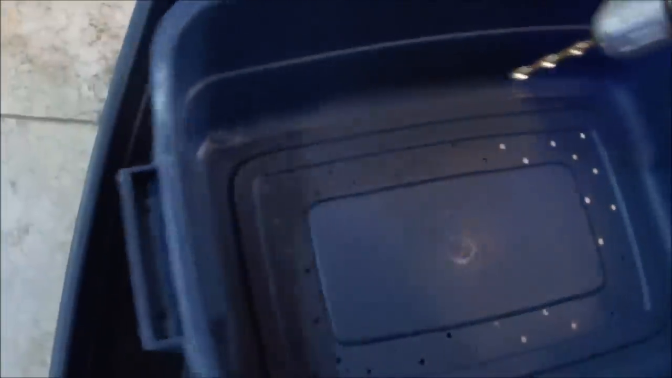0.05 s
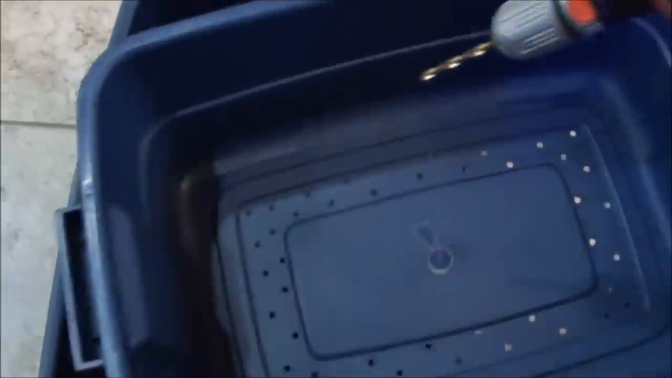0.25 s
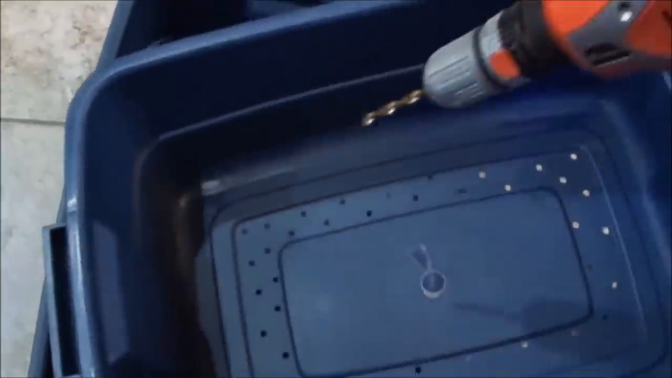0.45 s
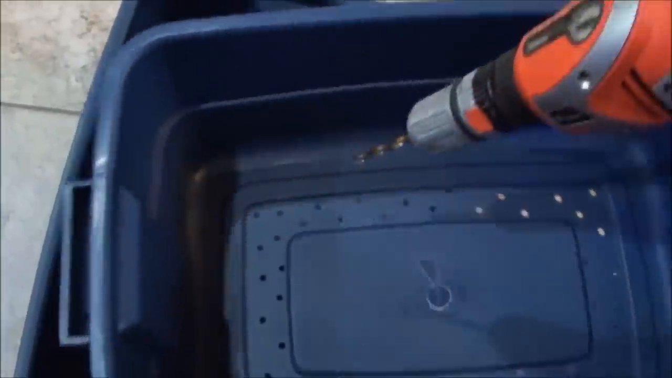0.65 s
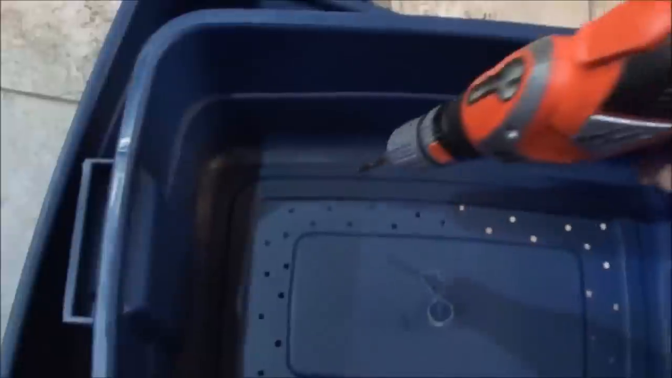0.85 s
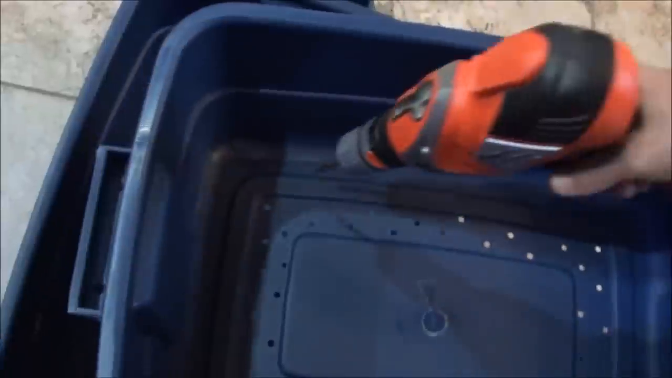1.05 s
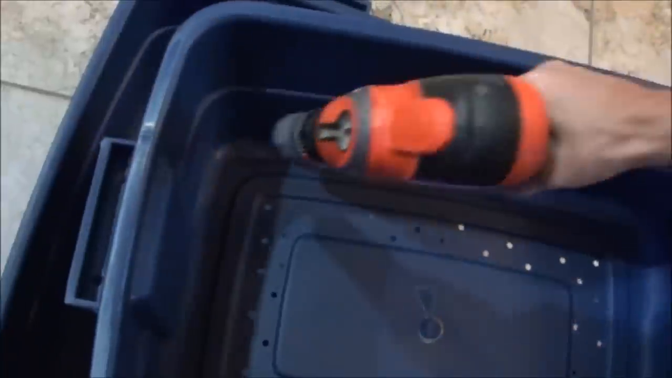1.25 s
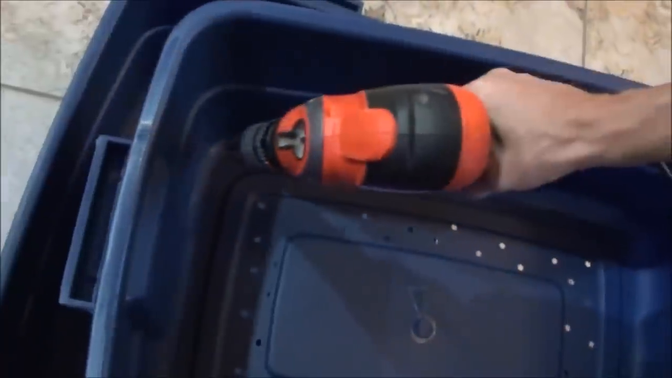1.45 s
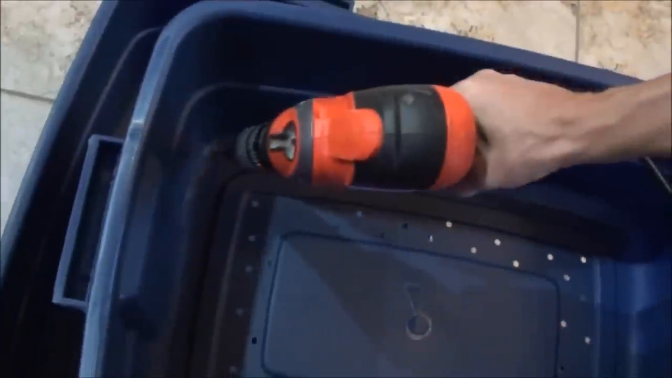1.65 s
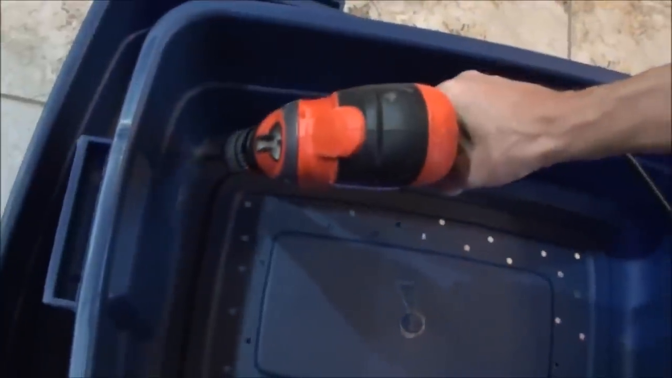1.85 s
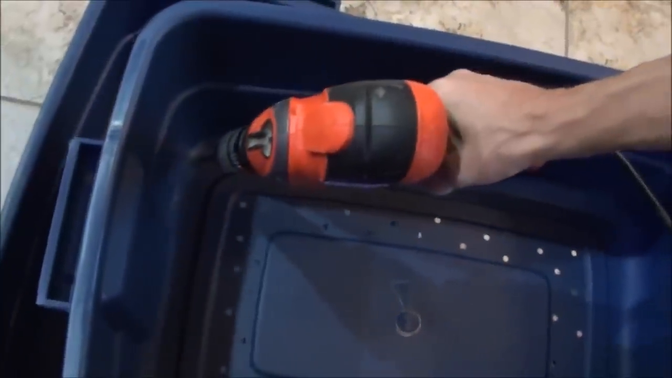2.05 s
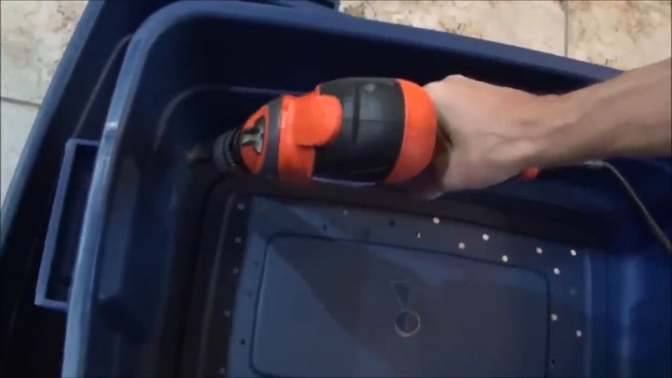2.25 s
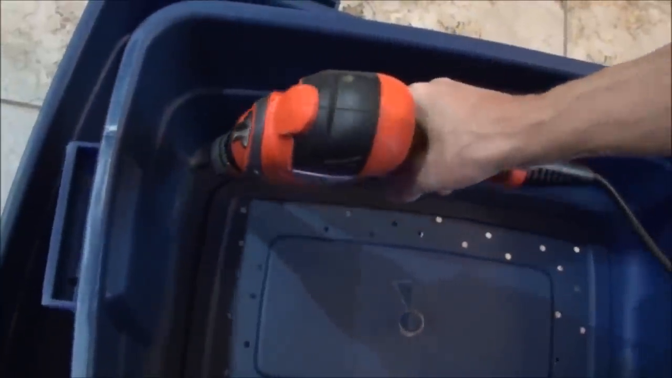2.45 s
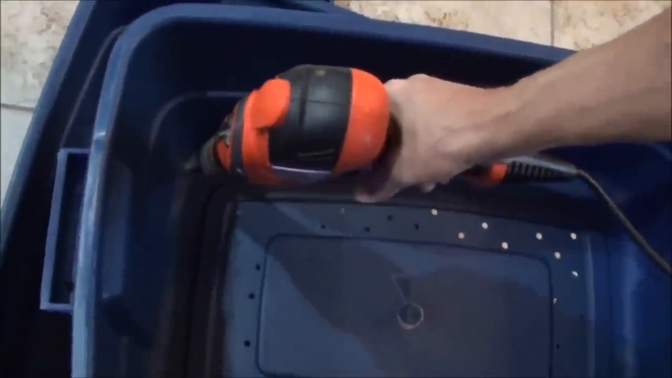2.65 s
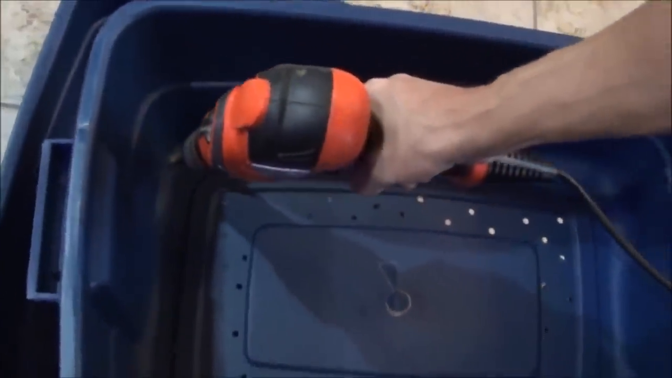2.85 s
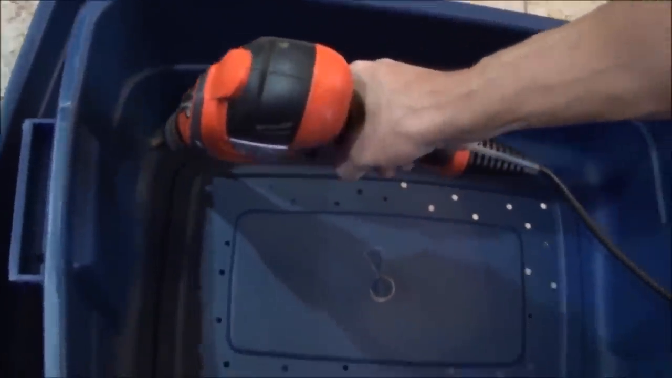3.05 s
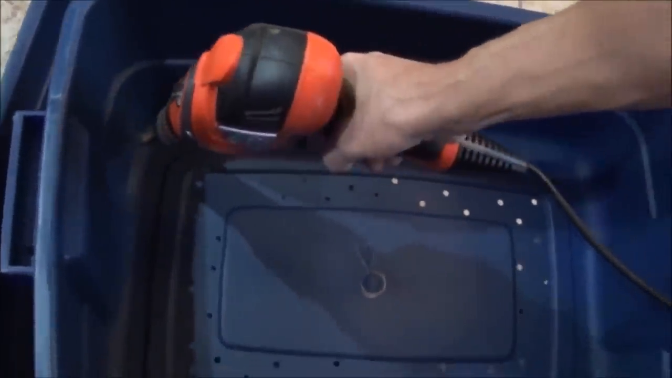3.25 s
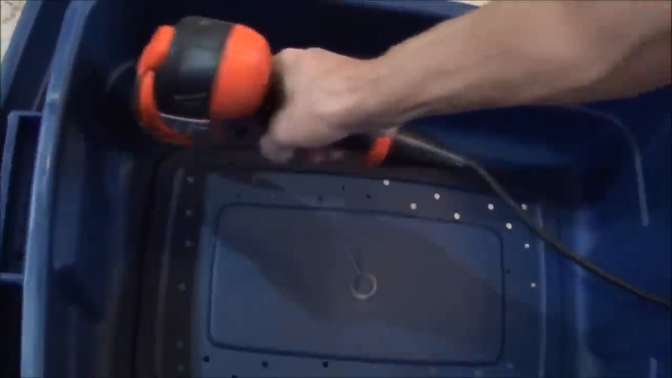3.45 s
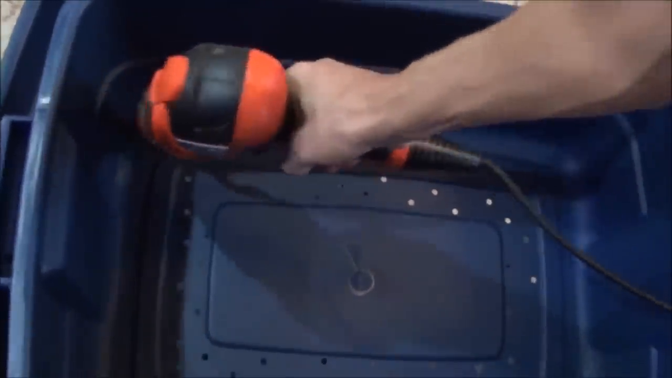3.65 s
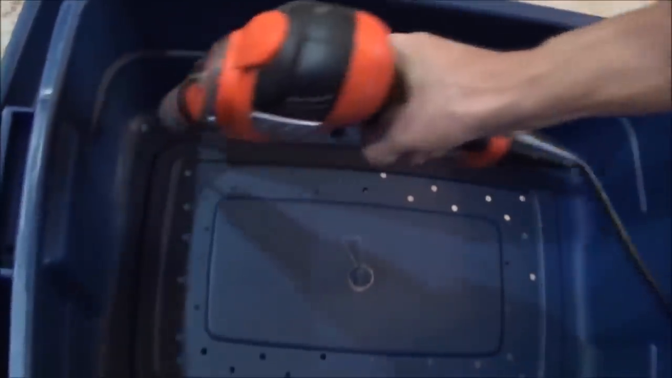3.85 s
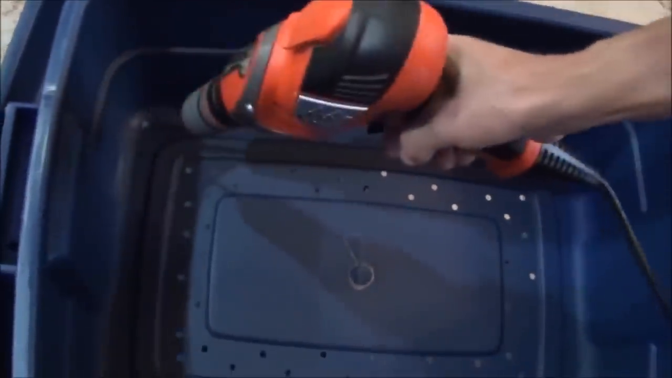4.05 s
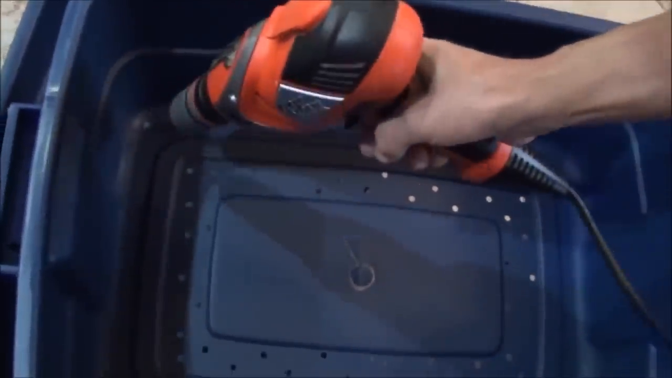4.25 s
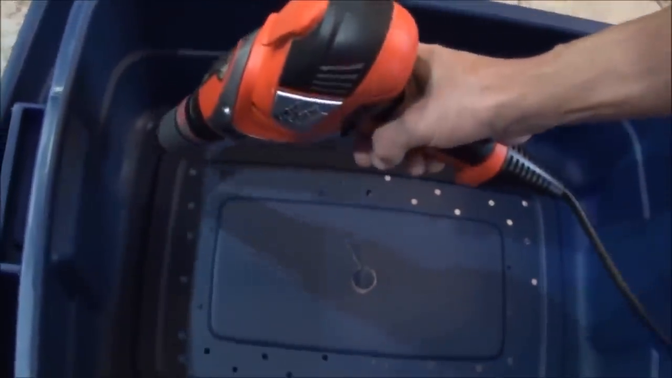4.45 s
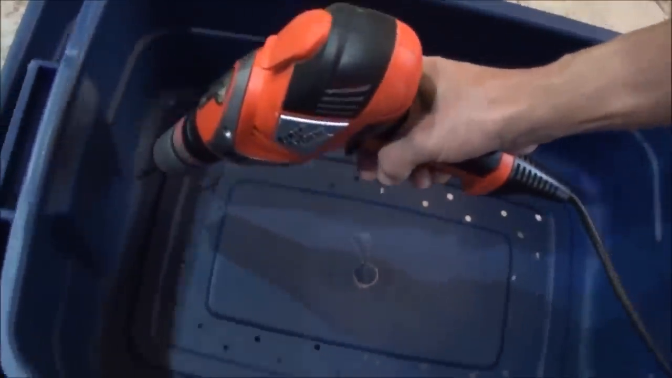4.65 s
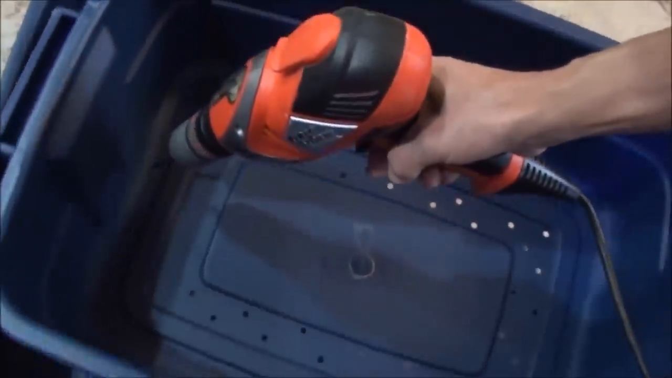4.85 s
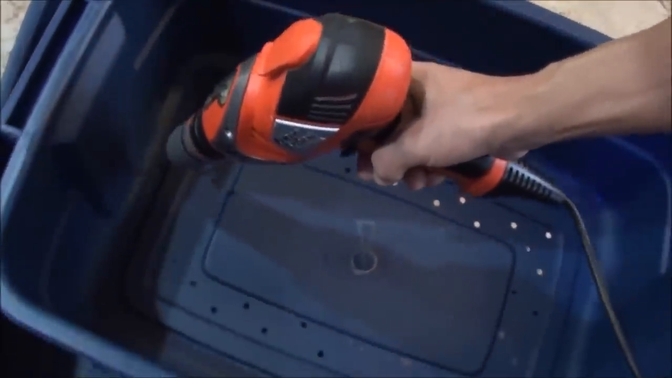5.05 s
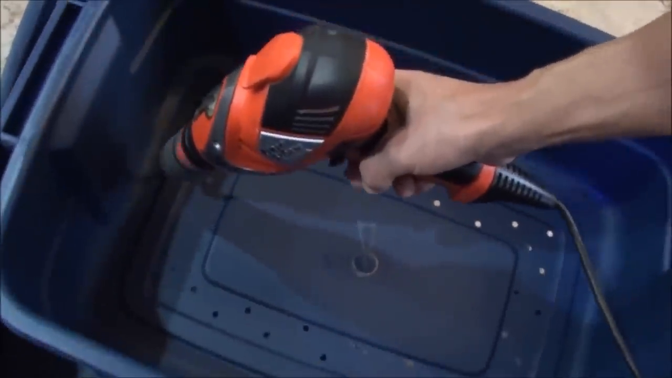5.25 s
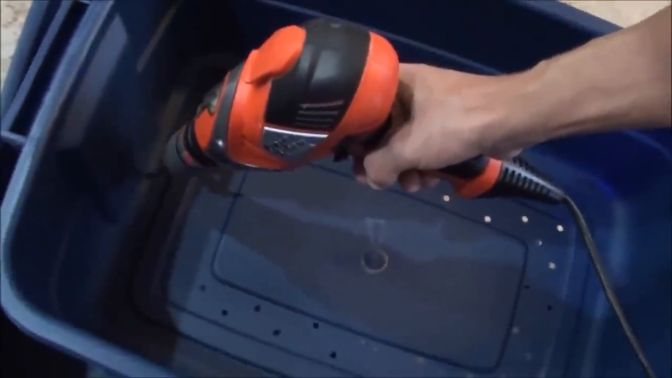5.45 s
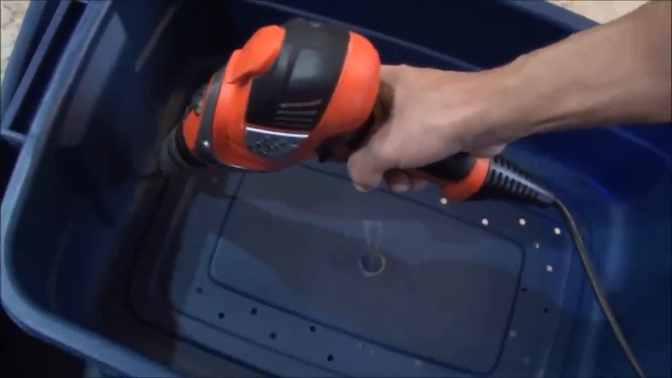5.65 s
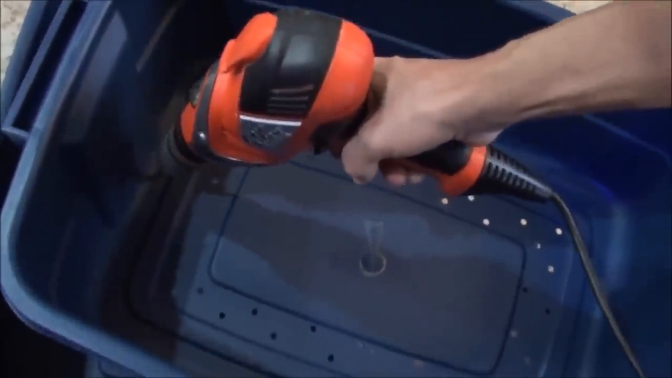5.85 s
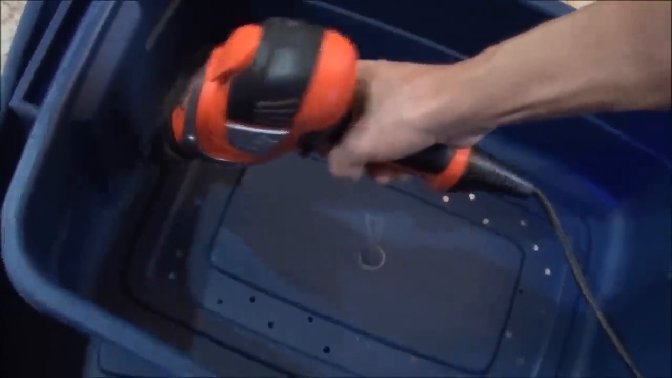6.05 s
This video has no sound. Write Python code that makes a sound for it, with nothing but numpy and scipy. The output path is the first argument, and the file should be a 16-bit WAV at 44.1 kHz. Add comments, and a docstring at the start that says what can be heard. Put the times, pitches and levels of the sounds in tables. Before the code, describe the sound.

A corded electric drill is moved into a plastic storage tub with hollow knocks, rubbing, a short skid and a few tiny ticks. After faint squeaks and sharp clicks, the motor winds up in a rising, rattling whine and briefly tears through the plastic wall. It coasts down with a falling whine, then starts up again right at the end. The sound is close, in a small, quiet room.

```python
"""A drill in a plastic tub

A corded drill is carried into a storage tub, knocking and rubbing against it. The bit is set on
the wall, the trigger clicks, and the motor winds up, bores through and coasts down; just before
the end the trigger is pulled again. One spinning shaft sets the pitch of the whining fan and
gears, heard over rattling teeth, hissing brushes and cooling air."""
import sys
import numpy as np
from scipy import signal
from scipy.fft import rfft, irfft
from scipy.io import wavfile
from scipy.ndimage import uniform_filter1d

SR = 44100
rng = np.random.default_rng(int(sys.argv[2]) if len(sys.argv) > 2 else 0)


def wrap_up_sound(samples):
    """Save the sound to the file named by the first command line argument, as 16-bit audio."""
    columns = np.atleast_2d(samples).T
    # keep every value between -1 and 1, then stretch to whole-number steps
    tamed = np.clip(columns, -1, 1)
    steps = np.round(tamed * 32767).astype(np.int16)
    wavfile.write(sys.argv[1], SR, steps)


N = 269451
TIME = np.arange(N) / SR
HIGHEST_HZ = 15780


# brief swells and dips of rattle and hiss: (middle [s], length [s], change [dB])
SURGES = [(3.046, 0.076, 1), (4.702, 0.25, 2), (5.094, 0.13, -4.5), (5.707, 0.072, 2.5)]
def drill():
    """One shaft drives the fan and gears; pulsing mains current makes it turn unevenly."""
    speed, current = shaft_speed(), motor_current()
    strain = current * np.exp(-speed / 130)  # a slow motor draws the most current
    ripple, mains = np.sin(2 * np.pi * 120 * TIME), np.sin(2 * np.pi * 60 * TIME)
    wobble = current * (.5 + 6 * strain) * (ripple + mains + drift(200)) + .15 * drift(60)
    angle = 2 * np.pi * np.cumsum(speed + wobble) / SR
    air = running_gain(speed, strain, top_db=-20, doubling_db=4.34, strain_db=-4.7)
    rattle = running_gain(speed, strain, top_db=-19, doubling_db=3.64, strain_db=25.3) * humps(SURGES)
    hiss = running_gain(speed, strain, top_db=-15.5, doubling_db=3.74, strain_db=13.6) * humps(SURGES)
    hiss /= 1 + (73 / speed) ** 6  # fades below 73 turns a second
    tones = (fan_whine(angle, speed, current, strain)
             + rattle * powered_whine(angle, current, strain)
             + hiss * coasting_whine(angle, speed, current)
             + air * rotor_hum(angle, speed))
    spun_up = np.clip(speed / 60 - 1, 0, 1)  # tones only stand out once the shaft is fast
    throb = amp(2.6 * strain * ripple + 1.08 * drift(72))  # pulses of current shake a slow motor
    return (np.sqrt(2) * spun_up * tones
            + rattle * gear_rattle(angle, speed, throb)
            + hiss * brush_hiss(speed, throb)
            + air * cooling_air(speed, current))


# the shaft on the first pull: (time [s], speed [turns/s])
SPIN_UP = [(2.755, 2.5), (2.9, 62.5), (3.05, 134), (3.2, 191.5), (3.35, 240), (3.5, 292), (3.62, 316.5),
           (3.8, 347.5), (4.09, 377.8)]
# the shaft on the second pull: (time [s], speed [turns/s])
RESTART = [(5.87, 109), (5.935, 109), (6.0, 167), (6.06, 214.5), (6.11, 245)]
def shaft_speed():
    """Turns per second: the motor winds up, is slowed by friction and fan drag, then picks up again."""
    friction_loss, drag_speed = 92, 295.3  # turns/s lost each second; speed where drag equals friction
    off_s, top = SPIN_UP[-1]
    coast = drag_speed * np.tan(np.arctan(top / drag_speed) - friction_loss / drag_speed * (TIME - off_s))
    speed = np.select([TIME < off_s, TIME < RESTART[0][0]], [curve(SPIN_UP), coast], curve(RESTART))
    return uniform_filter1d(speed, size=2400, mode="nearest")  # inertia smooths each change


# pulls of the trigger: (pressed [s], released [s])
PULLS = [(2.755, 4.06), (5.735, 6.2)]
def motor_current():
    """Current from 0 to 1: the trigger rests halfway, is squeezed home and is let go."""
    part, full = .52, .949
    return sum((part * (TIME >= on) + (full - part) * ramp(on + .125, .043)) * (1 - ramp(off, .048))
               for on, off in PULLS)


def running_gain(speed, strain, top_db, doubling_db, strain_db):
    """A running noise starts at the first pull, grows with speed and changes with strain."""
    doublings = np.log2(np.maximum(speed, 20) / speed.max())
    return amp(top_db + doubling_db * doublings + strain_db * strain) * (TIME >= PULLS[0][0])


# how strongly the housing passes the fan's tone: (pitch [Hz], level [dB])
FAN_RESPONSE = [(4500, -16.5), (5150, -30), (5450, -20.5), (5750, -23), (6400, -14), (7300, -10),
                (8500, -12.5), (9350, -11), (10800, -21), (11800, -13.5), (13500, -18), (14300, -16.5),
                (15100, -24)]
# echoes inside the tub: (delay [s], gain [ratio])
TUB_ECHOES = [(.0031, 0.24), (.0074, -0.2), (0.0128, .17), (0.022, -0.21)]
# brief dips in the whine: (middle [s], length [s], change [dB])
WHINE_DIPS = [(4.02, .1, -7), (5.283, 0.054, -18), (6.09, .24, -3)]
def fan_whine(angle, speed, current, strain, blades=40):
    """The passing blades make a tone that flutters as it slides through the tub's echoes."""
    gain = amp(read(FAN_RESPONSE, blades * speed) - 2.5 * current - 12 * strain)
    flicker = amp((.9 + 1.6 * current) * drift(45) - .5)
    tone = gain * flicker * np.sin(blades * angle)
    echoes = sum(share * np.interp(TIME - delay, TIME, tone) for delay, share in TUB_ECHOES)
    return (tone + echoes) * humps(WHINE_DIPS)


# whining tones of the gear teeth and the motor's contact bars: (pitch [cycles/turn], level [dB])
POWERED_TONES = [(9, -11), (12, -12.5), (18, -10), (27, -16), (36, -11)]
# tone colour of the gearbox: (frequency [Hz], level [dB])
GEARBOX = [(60, -38), (140, -52), (290, -2.5), (480, -24.5), (850, -16), (1600, -3), (2500, -1.5),
           (3100, 1.5), (3700, 3.5), (4450, 4), (5400, -3.5), (6300, -7), (7200, 2), (16000, -19.5)]
def powered_whine(angle, current, strain):
    """The gear teeth and the motor's contact bars whine, louder when the motor pushes hard."""
    tones = sum(amp(db) * (.8 + .6 * drift(60)) * np.sin(k * angle) for k, db in POWERED_TONES)
    return (.06 + .2 * current + 1.5 * strain) * colour(tones, GEARBOX)


# tones of the free-running shaft: (pitch [cycles/turn], level [dB])
COASTING_TONES = [(24, -17.5), (36, -14), (42, -17), (48, -17), (60, -21), (72, -22), (80, -20), (84, -26)]
# how well the casing gives them off: (frequency [Hz], level [dB])
CASING_RESPONSE = [(2500, -16), (3300, -8), (3700, 0), (4220, 7), (4600, -6), (6000, -3), (7500, 3),
                   (10000, -2), (12500, 0), (15500, -4)]
def coasting_whine(angle, speed, current):
    """The motor's contact bars, gears and fan add high tones that come out when the power is off."""
    tones = sum(amp(db + 4 * drift(14)) * np.sin(k * angle) * (k * speed < HIGHEST_HZ)
                for k, db in COASTING_TONES)
    return (1 - current) * np.minimum(170 / speed, 1) ** 2 * colour(tones, CASING_RESPONSE)


def rotor_hum(angle, speed):
    """The off-balance rotor hums at two and three times its turning rate."""
    tones = amp(-15) * np.sin(2 * angle) + amp(-14) * np.sin(3 * angle)
    return tones * (.7 + .7 * drift(25)) * speed / speed.max()


# the housing's ringing at speed: (pitch [Hz], width [Hz], level [dB])
FAST_RING = [(1646, 60, -5), (2360, 90, -3), (3040, 130, -3), (4430, 170, 3), (4870, 130, 2),
             (7250, 260, -1), (7865, 170, 1), (9400, 320, 2), (11600, 260, -8), (14430, 300, -14)]
# the casing's ringing under slow teeth: (pitch [Hz], width [Hz], level [dB])
SLOW_RING = [(274, 77, 2), (1320, 380, 3), (2300, 100, 4.5), (2620, 140, 3), (4240, 270, -2), (4590, 24, 9),
             (7400, 610, -7), (8020, 48, 12), (10150, 360, -12)]
def gear_rattle(angle, speed, throb, teeth=9):
    """Gear teeth strike one after another and ring the drill's shell."""
    chatter = unit(noise() * (1 + .24 * np.cos(teeth * angle)) * (1 + .13 * np.cos(angle)))
    strikes = amp(-2) * unit(chatter + .4 * grains(1500, 4.7)) * throb
    fast = colour(strikes, GEARBOX) + .742 * resound(noise() * throb, FAST_RING)
    slow_share = np.exp(-(speed / 85) ** 2)
    return np.sqrt(1 - slow_share) * fast + np.sqrt(slow_share) * resound(strikes, SLOW_RING)


# tone colour of the brushes: (frequency [Hz], level [dB])
BRUSH_COLOUR = [(2000, -40), (5500, -3.5), (6600, -2), (7200, 0), (7900, 1), (8900, -2), (9400, -4),
                (10200, -9), (11000, -9), (11600, -6), (12700, -14), (14400, -12), (16000, -19)]
def brush_hiss(speed, throb):
    """The motor's sliding contacts hiss and spark, a little brighter at speed."""
    sparks = colour(unit(noise() + .5 * grains(2500, 9)) * throb, BRUSH_COLOUR)
    treble = signal.sosfiltfilt(highpass(3, 10300), sparks)
    treble_gain = amp(.65 * (speed / speed.max() - 4))
    return amp(-1.07) * (sparks + treble * (treble_gain - 1))


# tone colour of the rushing air: (frequency [Hz], level [dB])
AIR_COLOUR = [(60, -37), (140, -37.5), (290, -12), (420, -11.5), (680, -4.5), (950, -5.5), (1130, -5.5),
              (1370, -2.5), (1900, -7), (3000, -9.5), (8000, -56)]
# ringing of the vents: (pitch [Hz], width [Hz], level [dB])
VENT_RING = [(710, 75, -8), (1376, 200, -3.5), (1574, 132, -5.5)]
def cooling_air(speed, current):
    """The fan blows a rush of air, and the vents roar while it coasts."""
    wind = amp(-1.5 - .5 * current) * colour(noise() * amp(1.47 * drift(24)), AIR_COLOUR)
    roar = amp(-2.5) * (1 - current) * speed / 320 * resound(noise(), VENT_RING)
    return wind + roar


# loudness of the cut: (time [s], level [dB])
CUT_LEVEL = [(3.3, -33), (3.55, -29), (3.68, -20.5), (3.9, -20), (4.02, -23.5), (4.12, -65)]
# tone colour of the cut: (frequency [Hz], level [dB])
CUT_COLOUR = [(40, -42), (120, -15), (220, -6), (330, 1), (450, -8), (750, -3.5), (1000, 6.5), (1300, -3),
              (3000, -31), (5400, -12), (5900, 3), (6400, -18), (14000, -37)]
def boring():
    """The bit tears plastic in small bites that shake the wall."""
    bites = unit(noise() + .6 * grains(500, 2.4)) * amp(.94 * drift(50))
    return level(CUT_LEVEL) * colour(bites, CUT_COLOUR)


# knocks and clicks, before each part's boost: (time [s], boom [dB], clack [dB], click [dB], contact [s])
KNOCKS = [(0.1495, -7.5, -7.5, -21.5, 0.0018), (.257, -18.5, -42, -52, .004), (.263, -14.5, -42, -53, .002),
          (0.684, -29, -34, -30, .004), (.710, -23, -33, -39, .006), (0.8739, -9, -9.5, -16.5, 0.0029),
          (1.2947, -20.5, -9.5, -21, 0.00081), (2.03, -43, -42, -41, .004), (2.6306, -41, -18, -11, 0.0024),
          (2.639, -22, -9, -14, 0.00081), (2.661, -42, -41, -35, 0.018), (2.757, -24, -18.5, -11.5, 0.002),
          (5.44, -17.5, -30, -51, 0.0032)]
# ringing of the tub's walls: (pitch [Hz], level [dB], time to fade 60 dB [s])
TUB_RING = [(126, -29, 0.2), (251, -9, 0.18), (289, -2, 0.098), (319.5, -5, 0.49), (378.5, -0.5, 0.12),
            (371, -0.5, 0.13), (451, -12.5, 0.19), (492, 0, 0.16), (580, 9, 0.042), (760, -5, 0.22),
            (915, -18, 0.16), (1103, -13, 0.37)]
# tone colour of a plastic clack: (frequency [Hz], level [dB])
CLACK_COLOUR = [(40, -49), (120, -4), (400, 3.5), (900, 5.5), (1500, 7), (2300, -0.5), (3500, -12.5),
                (6000, -31), (14000, -38)]
# tone colour of a hard click: (frequency [Hz], level [dB])
CLICK_COLOUR = [(60, -48), (500, 2), (2000, 9), (3500, 12), (4700, 10), (6500, 7), (8200, 7), (10500, -3.5),
                (16000, -19)]
def knocks():
    """Each blow pushes the tub's walls, cracks, and sets off a short clatter of plastic."""
    push, crack, clack, click = np.zeros((4, N))
    for s, boom_db, clack_db, click_db, contact_s in KNOCKS:
        push[int(s * SR)] = amp(boom_db + 22.5)
        crack[int(s * SR)] = amp(clack_db + 14.5)  # the first contact
        clack += amp(clack_db) * burst(s, contact_s + .003)
        click += amp(click_db) * burst(s, contact_s + .0049)
    boom = signal.sosfilt(highpass(2, 130), ring(push, TUB_RING))  # thin walls give off little bass
    return boom + colour(crack + clack * noise(), CLACK_COLOUR) + colour(click * noise(), CLICK_COLOUR)


# light taps: (time [s], relative level [dB])
TICKS = [(.802, -40), (1.078, -27.5), (1.093, -31), (1.131, -33), (1.152, -32), (1.184, -31.5),
         (2.416, -39.5)]
# their tone colour: (frequency [Hz], level [dB])
TICK_COLOUR = [(2060, -69), (3500, -13), (4410, -13), (4550, -9), (5040, -5), (7490, 7.5), (9330, -6),
               (15000, -20)]
def ticks():
    """The cord and the chuck, which grips the bit, make tiny bright ticks."""
    taps = sum(amp(db) * burst(s, .0038) for s, db in TICKS)
    return amp(4) * colour(taps * noise(), TICK_COLOUR)


# the hand shifts drill and tub: (middle [s], length [s], rumble [dB], rub [dB], swish [dB])
SHIFTS = [(0, 0.12, -27, -33.5, -53), (0.208, 0.46, -24.5, -32.5, -43), (0.392, 0.24, -31.5, -35.5, -38),
          (0.504, 0.19, -27, -34.5, -44), (.66, .2, -31, -37, -36.5), (0.827, 0.17, -35, -36, -45),
          (0.925, 0.16, -28.5, -24.5, -35), (0.996, .11, -28, -25, -34.5), (1.057, 0.26, -26, -33, -41.5),
          (1.266, 0.091, -36, -61, -59), (1.34, .14, -50, -34, -50), (1.516, 0.16, -34, -45, -39.5),
          (2.06, 0.21, -36.5, -43.5, -47), (2.31, 0.51, -60, -46, -49), (2.684, 0.22, -35.5, -37.5, -47)]
# the walls' low rumble: (frequency [Hz], level [dB])
RUMBLE_COLOUR = [(24, -55), (40, -19), (102, -12.5), (140, -16.5), (235, -3), (371, -1), (445, -12),
                 (625, -8), (685, -34), (900, -37), (1170, -32), (1980, -120)]
# the mid-pitched rub: (frequency [Hz], level [dB])
RUB_COLOUR = [(290, -25.5), (500, 2), (1080, 0), (1170, 1), (1650, -2), (2140, -3), (3880, -12.5),
              (6000, -60), (7800, -38), (13200, -120)]
# the high swish: (frequency [Hz], level [dB])
SWISH_COLOUR = [(2350, -32), (4000, -5), (4280, -1.5), (5170, -3.5), (7570, -0.5), (11300, -13.5),
                (15100, -22), (15600, -28)]
def handling():
    """Uneven friction drums, rubs and swishes on the tub, swelling with each shift of the hand."""
    grip_db = np.array([[-35], [-40.5], [-48]])  # rumble, rub and swish between shifts
    settle_db = -7.5 * ramp(1.585, .18)  # the rubbing grows quieter as the hand settles
    grip = amp(grip_db + settle_db) * (TIME < PULLS[0][0])
    shift_power = sum((amp(db)[:, None] * swell(s, length_s)) ** 2 for s, length_s, *db in SHIFTS)
    drumming, rubbing, swishing = np.sqrt(grip ** 2 + shift_power)
    rumble = amp(-4.5) * drumming * colour(noise() * amp(3.3 * drift(32)), RUMBLE_COLOUR)
    rub = amp(-.5) * rubbing * colour(unit(noise() + .5 * grains(400, 3.1)), RUB_COLOUR)
    swish = swishing * colour(unit(noise() + .28 * grains(700, 4)), SWISH_COLOUR)
    return rumble + rub + swish


# loudness of the skid: (time [s], hiss [dB], groan [dB])
SKID_LEVEL = [(.67, -35, -52), (.7, -30.5, -19), (.712, -15.5, -16), (.73, -18.5, -19), (.748, -25, -25),
              (.77, -36, -23), (.8, -32, -48)]
# the skid's hiss: (frequency [Hz], level [dB])
SKID_COLOUR = [(290, -41), (500, -17), (962, -9), (1910, 2), (2230, -11), (2500, -1.5), (2680, -10),
               (4940, -19.5), (5860, -18), (8610, -16.5), (15000, -41)]
# the wall's groan: (frequency [Hz], level [dB])
GROAN_COLOUR = [(60, -36), (120, -21.5), (170, -31), (255, -17), (295, 0), (320, -1), (360, -24),
                (700, -31), (1500, -49)]
def skid():
    """The drill skids along the wall in tiny slips that hiss and make the wall groan."""
    slips = unit(noise() + grains(858, 2.7)) * (TIME < SKID_LEVEL[-1][0])
    hiss = level(SKID_LEVEL) * colour(slips, SKID_COLOUR)
    groan = level(SKID_LEVEL, column=2) * colour(slips, GROAN_COLOUR)
    return hiss + groan


# the bit is set on the wall: (middle [s], length [s], pitch [Hz], level [dB], width [Hz])
SQUEAKS = [(2.26, .12, 5900, -47, 350), (2.335, .1, 3600, -42, 110), (2.39, .14, 3620, -51, 200),
           (2.595, .07, 3590, -44, 130), (2.6, .07, 6450, -46, 300)]
def squeak(s, length_s, hz, db, width_hz):
    """The bit slips unevenly and sounds one thin, fuzzy pitch."""
    phase = 2 * np.pi * hz * TIME
    tone = drift(width_hz) * np.sin(phase) + drift(width_hz) * np.cos(phase)
    return amp(db) * swell(s, length_s) * tone


# the room's own noise: (frequency [Hz], level [dB])
ROOM_COLOUR = [(25, -17), (60, -19), (190, 1.5), (350, -5), (800, -10), (1500, -16), (4000, -8.5),
               (8000, -13.5), (10000, -15), (15500, -13.5)]
def room_tone():
    """A soft hush with a faint, steady whistle."""
    return amp(-44.5) * colour(noise(), ROOM_COLOUR) + amp(-58) * np.sin(2 * np.pi * 8400 * TIME)


# how long the room rings: (frequency [Hz], time to fade 60 dB [s])
ROOM_FADE = [(150, 0.2), (1000, 0.16), (4000, 0.37), (14000, 0.02)]
def room_echoes(x):
    """Scattered reflections, different at each ear; the highest treble dies first."""
    taps = rng.standard_normal((2, SR // 2)) * (rng.random((2, SR // 2)) < .08)
    taps[:, :SR // 300] = 0  # the wait for the first echo
    hz, t, spectrum = signal.stft(taps, SR, nperseg=256)
    fade = amp(-60 * t / read(ROOM_FADE, hz)[:, None])
    tail = signal.istft(spectrum * fade, SR, nperseg=256)[1]
    return signal.fftconvolve(x[None], tail / np.linalg.norm(tail[0]), axes=1)[:, :N]


def amp(db):
    """Turns decibels into a gain."""
    return 10 ** (np.asarray(db) / 20)


def unit(x):
    """Scales to an average power of 1."""
    return x / np.sqrt(np.mean(x ** 2) + 1e-20)


def curve(rows, column=1):
    """One column of a table, joined by straight lines in time."""
    rows = np.asarray(rows, float)
    return np.interp(TIME, rows[:, 0], rows[:, column])


def level(rows, column=1):
    """A dB column as a gain, silent before its first row and held after its last."""
    return amp(curve(rows, column)) * (TIME >= rows[0][0])


def ramp(s, length_s):
    """Rises from 0 at s to 1 over length_s."""
    return np.clip((TIME - s) / length_s, 0, 1)


def burst(s, decay_s):
    """Jumps to 1 at s and dies away."""
    return np.exp(-np.maximum(TIME - s, 0) / decay_s) * (TIME >= s)


def swell(s, length_s):
    """A smooth hump centred on s."""
    return np.cos(np.pi * np.clip((TIME - s) / length_s, -.5, .5)) ** 2


def humps(rows):
    """A gain of 1 that briefly swells or dips at each row."""
    return amp(sum(db * swell(s, length_s) for s, length_s, db in rows))


def noise():
    """White noise."""
    return rng.standard_normal(N)


def drift(hz):
    """A random wander, no faster than about hz."""
    return unit(irfft(rfft(noise()) / (1 + (np.fft.rfftfreq(N, 1 / SR) / hz) ** 4), N))


def grains(per_s, spread_db):
    """Scattered clicks of uneven size."""
    size = amp(spread_db * np.minimum(rng.exponential(1, N), 4))
    return unit(size * np.sign(noise()) * (rng.random(N) < per_s / SR))


def read(points, hz):
    """Looks up a table's value at hz, with octaves evenly spaced."""
    frequencies, values = np.transpose(points)
    return np.interp(np.log(hz + 1), np.log(frequencies + 1), values)


def colour(x, points):
    """Gives x a tone colour; only the differences between the table's levels count."""
    log_gain = np.log(amp(read(points, abs(np.fft.fftfreq(4096, 1 / SR)))))
    taps = np.fft.ifft(np.exp(np.conj(signal.hilbert(log_gain)))).real[:2048]  # rings only after a hit
    return signal.oaconvolve(x, taps / np.linalg.norm(taps))[:N]


def highpass(order, hz):
    """A filter that turns down everything below hz."""
    return signal.butter(order, hz, "high", fs=SR, output="sos")


def ring(x, modes):
    """x strikes a body that rings with fading tones; their levels are relative."""
    t = TIME[:SR // 2]
    body = sum(amp(db - 60 * t / fade_s) * np.sin(2 * np.pi * hz * t) * (-1) ** k
               for k, (hz, db, fade_s) in enumerate(modes))
    return signal.oaconvolve(x, body / np.linalg.norm(body))[:N]


def resound(x, resonances):
    """Rings tones given by their width: the wider, the sooner they fade."""
    return ring(x, [(hz, db + 20 * np.log10(width), np.log(1000) / np.pi / width)
                    for hz, width, db in resonances])


def scene():
    """The drill near the middle, the tub a little to the right, in a tiled room."""
    tool = drill() + boring()
    tub = knocks() + ticks() + handling() + skid() + sum(squeak(*row) for row in SQUEAKS)
    middle = tool + room_tone()
    direct = middle * amp([[-.4], [0]]) + tub * amp([[-1.2], [.9]])  # left, right
    return direct + room_echoes(amp(-15.5) * middle + amp(-13) * tub)


def record(dry):
    """The microphone sheds deep bass, rounds off loud peaks and loses the highest treble."""
    thin = signal.sosfilt(highpass(2, 50), dry)
    rounded = thin / (1 + abs(thin) ** 6) ** (1 / 6)
    lowpass = signal.firwin(511, HIGHEST_HZ, window=("kaiser", 9), fs=SR)
    return signal.oaconvolve(rounded, lowpass[None], "same", axes=1)


dry = scene()
out = record(dry)
wrap_up_sound(out)
```